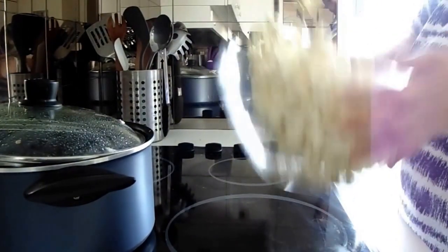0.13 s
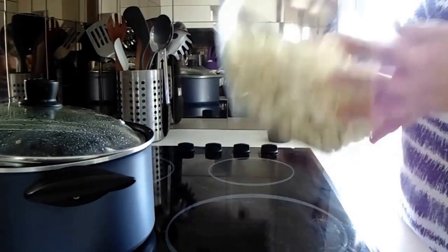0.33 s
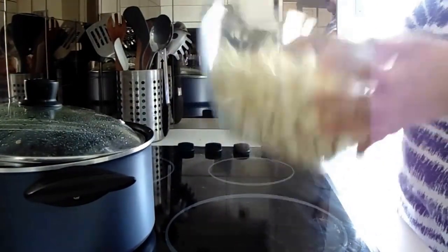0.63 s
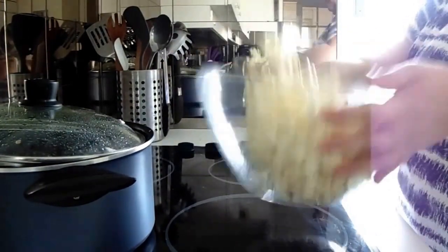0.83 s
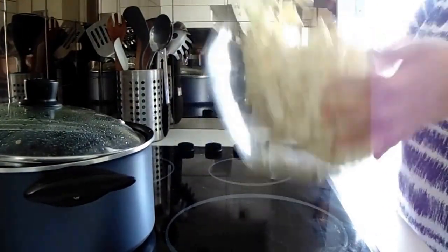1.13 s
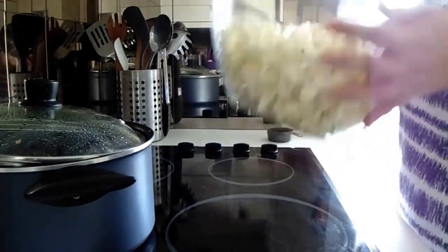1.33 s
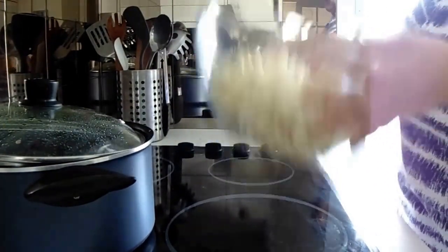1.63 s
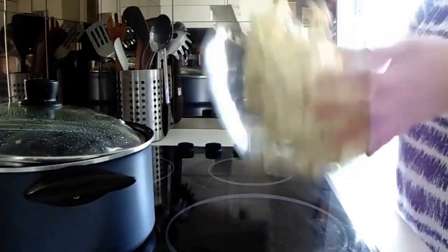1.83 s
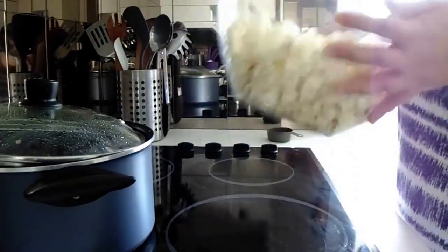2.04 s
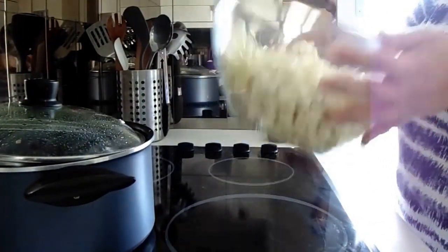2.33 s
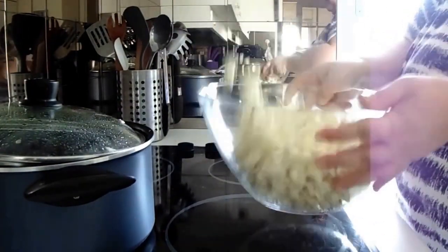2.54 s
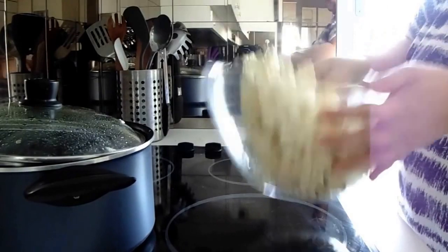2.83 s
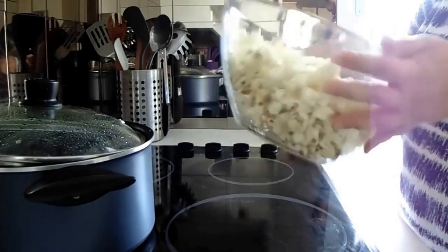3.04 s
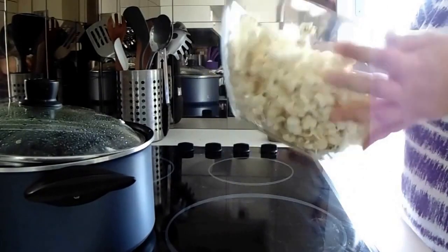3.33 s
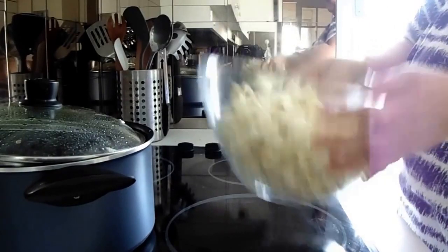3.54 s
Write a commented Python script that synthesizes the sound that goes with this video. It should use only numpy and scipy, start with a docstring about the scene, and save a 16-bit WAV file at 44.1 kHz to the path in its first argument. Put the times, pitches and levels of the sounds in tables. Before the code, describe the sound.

Popcorn is tossed in a glass bowl, each landing a crisp rustle and hollow patter with a brief glassy ring; early tosses are louder with hard kernel clinks, later ones softer. Close microphone, quiet kitchen.

```python
"""In a kitchen, popcorn is tossed eleven times in a large glass bowl, about three tosses a second.
Each heap lands with a crisp rustle and a hollow patter, both made of filtered random clicks.
The landings set the glass ringing as damped tones; between them, grainy hiss slides on the wall.
Hard kernels clink and single pieces tick, mostly in the first four, stronger tosses.
Decaying noise gives the room's reflections, and steady coloured noise its quiet hush."""
import sys
import numpy as np
from scipy import signal
from scipy.fft import rfft, irfft, next_fast_len
from scipy.io import wavfile
from scipy.ndimage import uniform_filter1d

SR = 44100
rng = np.random.default_rng(int(sys.argv[2]) if len(sys.argv) > 2 else 0)


def transcribe(u):
    """Save the signal u as a 16-bit wav file named by the first command-line argument.

    u: samples, shape (n,) or (channels, n), limited to [-1, 1]; the rate is SR.
    q: integer samples, one column per channel.
    """
    v = np.clip(np.atleast_2d(u).T, -1, 1)
    q = np.round(v * 32767).astype(np.int16)
    wavfile.write(sys.argv[1], SR, q)


N = 163170
TIME = np.arange(N) / SR   # [s]

# All table levels are relative: each layer is trimmed again in the mix.
# Landings of the heap: (time of the height [s], rise [s], fall [s], crackle [dB], patter [dB],
# low glass ring [dB], upper glass ring [dB]); the layers also scale rise and fall
LANDINGS = [ (0.179, 0.031, 0.069, -19, -32.5, -25.5, -27), (.540, 0.044, 0.058, -18.5, -32, -26.5, -26.5),
            (0.856, 0.042, 0.057, -21.5, -35, -31.5, -30.5), (1.188, 0.042, 0.045, -19.5, -33, -25, -27.5),
            (1.518, 0.038, 0.059, -28, -40, -41.5, -47.5), (1.88, 0.043, 0.069, -23, -34.5, -33, -37),
            (2.205, 0.045, 0.052, -24.5, -34, -37.5, -45.5), (2.530, 0.042, 0.051, -26.5, -37, -34, -42.5),
            (2.869, 0.049, 0.056, -24.5, -35.5, -32.5, -49.5),
            (3.169, 0.048, 0.054, -23.5, -34.5, -32.5, -39), (3.472, 0.04, 0.053, -22, -32.5, -39, -37.5)]
# Sliding on the wall, a level curve: (time [s], level [dB])
SLIDE_CURVE = [(0, -34), (.1, -37), (.25, -36.5), (.36, -37), (.65, -35.5), (.76, -37.5), (1.0, -35.5),
               (1.1, -41), (1.3, -33.5), (1.45, -43), (1.63, -43), (1.78, -47.5), (2.08, -60), (2.2, -40),
               (2.37, -42), (2.7, -43.5), (3.05, -55), (3.35, -46.5), (3.7, -39)]
# Kernels striking the glass; the place they hit decides which modes answer:
# (time [s], clatter [dB], clatter fall [s], ring [dB], favoured pitch [Hz])
CLINKS = [(.1355, -25, 0.015, -22, 6200), (.138, -30, .010, -21.5, 1820), (.139, -33, .010, -14, 3740),
          (.158, -34, 0.0075, -12, 3560), (0.486, -52, .010, -17, 1860), (0.5229, -18.5, 0.0084, -10, 6460),
          (.526, -32, 0.0098, -9.5, 3700), (.822, -47, .008, -22, 1860), (.8465, -26, 0.011, -20.5, 6650),
          (.849, -31, 0.014, -17, 3670), (1.1075, -50.5, .010, -28.5, 1830),
          (1.1235, -28, 0.016, -18, 3630), (1.150, -38, 0.012, -19, 1840), (1.1755, -16, .011, -22, 8530),
          (1.2010, -18.5, 0.009, -17, 6540), (1.2025, -25.5, 0.011, -15.5, 3680),
          (1.812, -38.5, .012, -27.5, 1850), (1.9350, -28, 0.01, -18.5, 5100),
          (2.161, -33, 0.014, -32.5, 1820), (2.268, -45, .008, -32, 1810), (2.493, -44.5, .008, -40, 1820),
          (2.8135, -29.5, .006, -31, 4740), (3.158, -30, 0.013, -33, 10600)]
# Single pieces ticking on the wall: (time [s], level of the snap [dB])
TICKS = [(.3675, -10), (0.3881, 3.5), (0.466, -11), (0.703, -9.5), (.7920, -19.5), (1.0005, -17.5),
         (1.033, -11), (1.0575, -12), (1.382, -18), (1.4303, -14.5), (1.654, -13.5)]
# Low modes of the bowl, damped by the hands: (frequency [Hz], level [dB], time to fall 60 dB [s])
LOW_MODES = [(1124, -14, .2), (1765, -9, .1), (1835, -7, .1), (1874, -2, .16), (1897, 0, .24)]
# Upper modes of the bowl, damped likewise: (frequency [Hz], level [dB], time to fall 60 dB [s])
UPPER_MODES = [(3490, -15, .1), (3555, -9, .11), (3602, -1, .25), (3648, -6, .19), (4868, -7, .18),
               (6084, -11, .14), (6271, -11, .13), (6611, -8, .14), (7900, -13, .1), (8846, -13, .12),
               (9275, -12, .12), (9780, -13, .1), (12721, -12, .13)]
# Spectrum of dry shells on each other: (frequency [Hz], density [dB per Hz])
CRACKLE_SPECTRUM = [(900, -16), (1500, -2), (2600, -3.5), (4200, -1.5), (6300, -0.5), (9500, -0.5),
                    (12000, 1), (14500, -1.5)]
# Spectrum of the soft heap in the hollow bowl: (frequency [Hz], density [dB per Hz])
PATTER_SPECTRUM = [(150, -22), (260, -19), (360, -12), (480, 1.5), (600, 1.5), (800, -3.5), (1130, 3.5),
                   (1400, -1), (1750, 1), (2600, -5), (5000, -13.5)]
# Spectrum of pieces skidding on the wall: (frequency [Hz], density [dB per Hz])
SLIDE_SPECTRUM = [(400, -9), (1100, -9.5), (2500, -11), (4500, -6.5), (7000, -3), (9500, -1), (14000, -5.5)]
# Spectrum of hard clatter and ticks: (frequency [Hz], density [dB per Hz])
CRACK_SPECTRUM = [(1500, -16), (3000, -10), (4500, -6), (6500, 0.5), (9000, -1), (14000, 3.5)]
# Spectrum of the quiet room: (frequency [Hz], density [dB per Hz])
HUSH_SPECTRUM = [(25, -0.5), (60, -0.5), (100, -2), (150, 1.5), (220, -5), (500, -4), (1200, -9),
                 (4000, -14.5), (14000, -19)]

TOP_ROUNDING = 0.3   # share of the fall time over which a landing stays near its height
PATTER_LAG_S = 0.014   # the bulk of the heap follows its first pieces
LOW_RING_LEAD_S, UPPER_RING_LEAD_S = 0.028, 0.023   # the first pieces meet bare glass
CLUMPS_PER_S, CLUMP_SHARED = 64, 0.3   # unevenness of the clicks, and the part all bands share
SNAPS_PER_S, SNAPS_DB, SNAP_FALL_S = 70, -13, 0.0022   # sparse, brittle snaps in each band
KERNEL_Q, KERNEL_DB = 8.9, 1.5   # a kernel's own click around the favoured pitch
FAVOUR_OCTAVES, OTHER_MODES_DB = 0.27, -28   # spread of the modes one strike excites; floor for the rest
SLIDE_DB, HUSH_DB = -1, -51.5
ROOM_T60_S, ROOM_DB, ROOM_FIRST_S = 0.47, -9, 0.0035   # decay, level, first reflection
CUTOFF_HZ = 14300
PEAK_LIMIT = 0.68   # full scale is 1


def rustle():
    """Dry shells crackle on each other while the soft heap patters into the hollow of the bowl."""
    crisp_level = landing_level("crackle")
    soft_level = landing_level("patter", shift_s=PATTER_LAG_S, rise=1.1)
    crackle = colour(clumps(crisp_level, per_s=12000, spread_db=-0.5, clump_db=2.05), CRACKLE_SPECTRUM)
    patter = colour(grains(soft_level, per_s=9000, spread_db=0.77), PATTER_SPECTRUM)
    return from_db(-4.5) * crackle + from_db(0.5) * patter


def landing_level(layer, shift_s=0, rise=1, fall=1):
    """Each landing swells like a bell curve, rounds off and dies away at its level for this layer."""
    column = ["crackle", "patter", "low ring", "upper ring"].index(layer)
    power = 0
    for at, rise_s, fall_s, *levels in LANDINGS:
        t = TIME - at - shift_s
        swell = 0.5 * (np.minimum(t, 0) / (rise_s * rise)) ** 2
        settle = np.hypot(np.maximum(t, 0) / (fall_s * fall), TOP_ROUNDING) - TOP_ROUNDING
        envelope = from_db(levels[column]) * np.exp(-swell - settle)
        power = power + envelope ** 2
    return np.sqrt(power)


def bowl():
    """The glass answers the front of each landing; its low modes sing faintly under the slide."""
    sliding = from_db(np.interp(TIME, *np.transpose(SLIDE_CURVE)))
    low = landing_level("low ring", shift_s=-LOW_RING_LEAD_S, rise=0.55, fall=1.23)
    upper = landing_level("upper ring", shift_s=-UPPER_RING_LEAD_S, rise=0.55, fall=1.2)
    low_with_slide = np.hypot(low, from_db(-14.5) * sliding)
    return (from_db(-4) * glass(low_with_slide, LOW_MODES, even_s=0.031)
            + from_db(-2.5) * glass(upper, UPPER_MODES, even_s=0.013))


def glass(level, modes, even_s):
    """Many light contacts keep the bowl's modes ringing, evened out to follow the given level."""
    taps = grains(level, per_s=4000, spread_db=6.0)
    sound = 0
    for k, (hz, db, t60) in enumerate(modes):
        sound = sound + (-1) ** k * from_db(db) * ring(taps, hz, t60)   # alternating polarity
    window = int(even_s * SR)
    power = np.maximum(uniform_filter1d(sound ** 2, window), 0)
    wanted = np.maximum(uniform_filter1d(level ** 2, window), 0)
    return sound * np.sqrt(wanted / (power + 1e-12))


def clinks():
    """Hard kernels clatter brightly at a pitch of their own and strike the modes of the bowl."""
    cracks = pitched = 0
    for at, db, fall_s, _, hz in CLINKS:
        clatter = from_db(db) * noise_burst(at, fall_s)
        cracks = cracks + clatter
        own = signal.lfilter(*signal.iirpeak(hz, KERNEL_Q, fs=SR), clatter + 1e-18)
        make_up = np.sqrt(SR * KERNEL_Q / (np.pi * hz))   # offsets the loss in the narrow band
        pitched = pitched + from_db(KERNEL_DB) * make_up * own
    out = pitched + from_db(1) * colour(cracks, CRACK_SPECTRUM)

    at, _, _, ring_db, favoured = np.transpose(CLINKS)
    for hz, db, t60 in LOW_MODES + UPPER_MODES:
        octaves_off = np.log2(hz / favoured)
        near = np.exp(-0.5 * (octaves_off / FAVOUR_OCTAVES) ** 2)
        near = np.maximum(near, from_db(OTHER_MODES_DB))
        moments = at + rng.random(len(at)) / hz   # random phase, within one cycle
        strikes = np.zeros(N)
        strikes[(moments * SR).astype(int)] = from_db(ring_db + db - 8) * near
        out += ring(strikes, hz, t60)
    return out


def ticks(tail_db=-24, tail_s=0.02):
    """Each piece gives one sharp snap, with a brief scatter inside the bowl."""
    out = np.zeros(N)
    for at, db in TICKS:
        out[int(at * SR)] += from_db(db)
        out += from_db(db + tail_db) * noise_burst(at, tail_s)
    return colour(out, CRACK_SPECTRUM)


def slide():
    """Loose pieces and crumbs skid along the wall with a thin, grainy hiss."""
    level = from_db(np.interp(TIME, *np.transpose(SLIDE_CURVE)) + SLIDE_DB)
    return colour(clumps(level, per_s=7900, spread_db=1.0, clump_db=2.5), SLIDE_SPECTRUM)


def kitchen(x):
    """Dense reflections from the hob, the tiles and the cupboards, as decaying noise."""
    t = TIME[:SR // 2]
    echoes = rng.standard_normal(len(t)) * from_db(-60 * t / ROOM_T60_S) * (t > ROOM_FIRST_S)
    return from_db(ROOM_DB) * signal.fftconvolve(x, echoes / np.linalg.norm(echoes))[:N]


def hush():
    """The quiet room is steady noise, strongest in the lows."""
    return from_db(HUSH_DB) * colour(rng.standard_normal(N), HUSH_SPECTRUM)


def clumps(level, per_s, spread_db, clump_db):
    """Pieces of different sizes each click in their own band, and arrive in small clumps."""
    edges_hz = [100, 1400, 2800, 5000, 7800, 11000, 16000]
    together, out = flutter(CLUMPS_PER_S), 0
    for band in zip(edges_hz, edges_hz[1:]):
        uneven = from_db(clump_db * (CLUMP_SHARED * together + flutter(CLUMPS_PER_S)))
        clicks = rms_one(uneven) * (grains(level, per_s, spread_db) + snaps(level))
        band_filter = signal.butter(2, band, "band", fs=SR, output="sos")
        out = out + signal.sosfilt(band_filter, clicks)
    return out


def grains(level, per_s, spread_db):
    """Random contacts of uneven size whose rms follows the level; they crowd as it rises."""
    chance = np.clip(per_s / SR * level / level.max(), 1e-4, 1)
    size_db = spread_db * np.minimum(rng.exponential(1, N), 4)
    sizes = rms_one(from_db(size_db) * rng.choice([-1, 1], N))
    hits = rng.random(N) < chance
    return level * sizes * hits / np.sqrt(chance)


def snaps(level):
    """Now and then a shell breaks or bounces: a noise burst of a few milliseconds."""
    keep = np.exp(-2 / (SNAP_FALL_S * SR))   # power falls twice as fast as amplitude
    events = grains(np.ones(N), per_s=SNAPS_PER_S, spread_db=1.0)
    power = signal.lfilter([1 - keep], [1, -keep], events ** 2 + 1e-18)
    return from_db(SNAPS_DB) * level * np.sqrt(power) * rng.standard_normal(N)


def flutter(rate):
    """Slow random unevenness with about the given number of swings a second, at unit rms."""
    r = np.exp(-2 * np.pi * rate / SR)
    slow = signal.lfilter([1], [1, -2 * r, r * r], rng.standard_normal(N + SR // 4))[-N:]
    return rms_one(slow - uniform_filter1d(slow, int(2 * SR / rate)))


def noise_burst(at, fall_s):
    """Noise starts at once and dies away exponentially."""
    return (TIME >= at) * np.exp(-np.abs(TIME - at) / fall_s) * rng.standard_normal(N)


def ring(x, hz, t60):
    """A two-pole resonator: a unit click sets a damped tone of height about 1 ringing."""
    r = from_db(-60 / (t60 * SR))
    w = 2 * np.pi * hz / SR
    return signal.lfilter([1, -1], [1, -2 * r * np.cos(w), r * r], x + 1e-18)


def colour(x, spectrum):
    """Causal (minimum-phase) filter with the given spectrum; about keeps the power of white noise."""
    hz, db = np.transpose(spectrum)
    size = 2 * next_fast_len(N)
    f = np.maximum(np.arange(size // 2 + 1) * SR / size, 1)
    gain = from_db(np.interp(np.log(f), np.log(hz), db))
    gain /= np.hypot(1, (0.5 * hz[0] / f) ** 2)   # roll off below the first point
    gain /= np.sqrt(np.mean(gain[f < CUTOFF_HZ] ** 2))
    # folding the cepstrum forward in time gives the minimum phase
    cepstrum = irfft(np.log(gain))
    cepstrum[1:size // 2] *= 2
    cepstrum[size // 2 + 1:] = 0
    return irfft(rfft(x, size) * np.exp(rfft(cepstrum)))[:N]


def from_db(db):
    """Decibels to gain."""
    return 10 ** (np.asarray(db) / 20)


def rms_one(x):
    """Scale to unit rms."""
    return x / np.sqrt(np.mean(x ** 2) + 1e-20)


def scene():
    """The popcorn and the ringing bowl in the kitchen, over the quiet hush of the room."""
    near = rustle() + bowl() + clinks() + ticks() + slide()
    return (near + kitchen(near) + hush())[None]


def record(dry):
    """The very highest peaks are rounded off and the top is cut steeply."""
    rounded = dry / (1 + (dry / PEAK_LIMIT) ** 4) ** 0.25
    top_cut = signal.ellip(12, 0.2, 80, CUTOFF_HZ, fs=SR, output="sos")
    return signal.sosfilt(top_cut, rounded)


dry = scene()
out = record(dry)
transcribe(out)
```